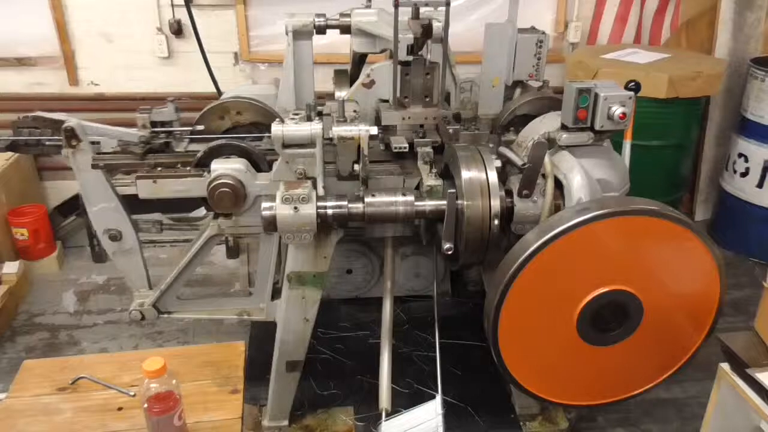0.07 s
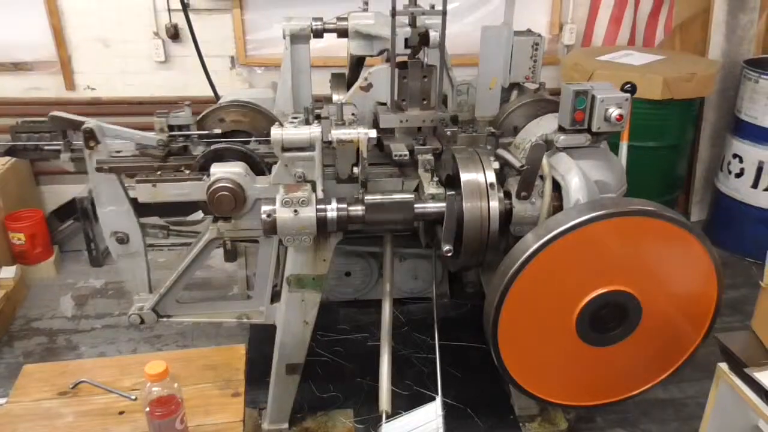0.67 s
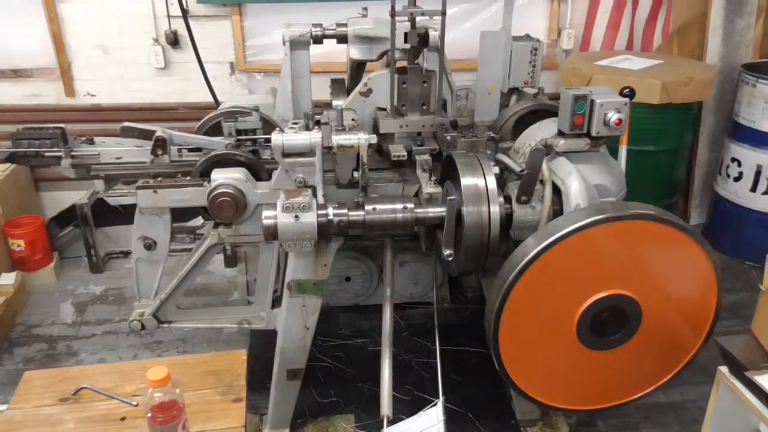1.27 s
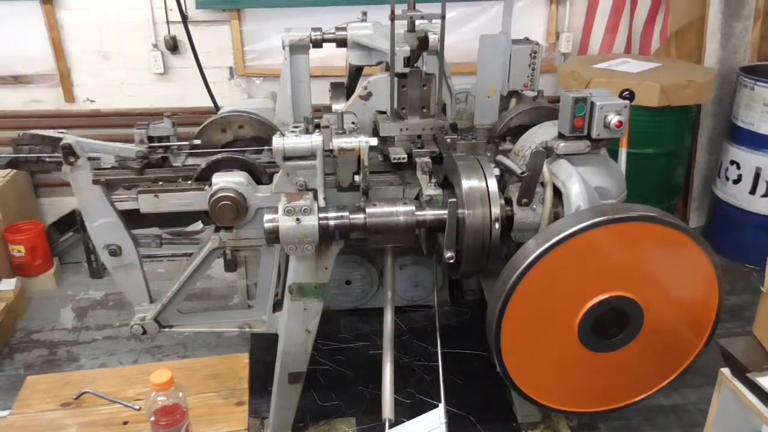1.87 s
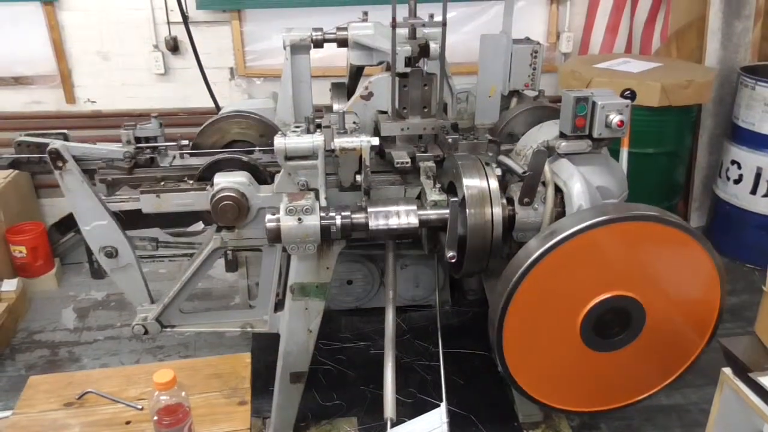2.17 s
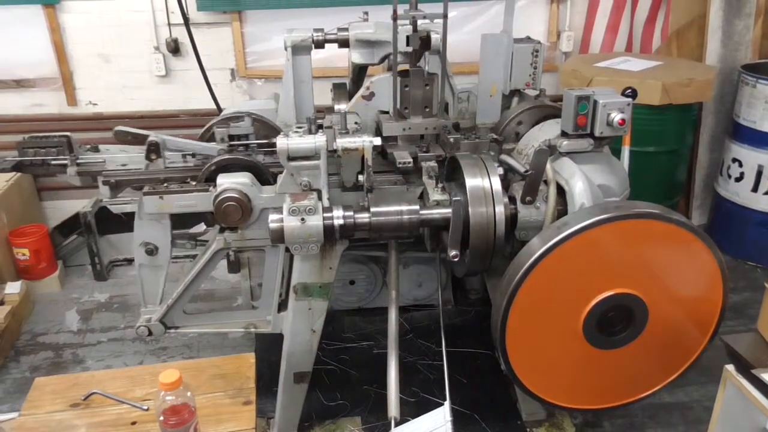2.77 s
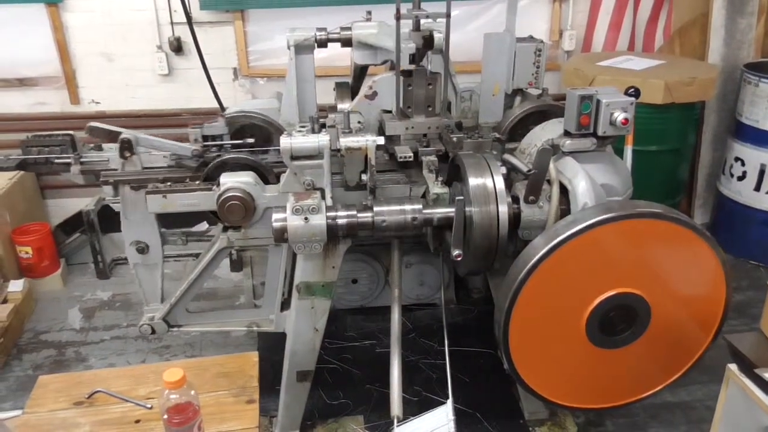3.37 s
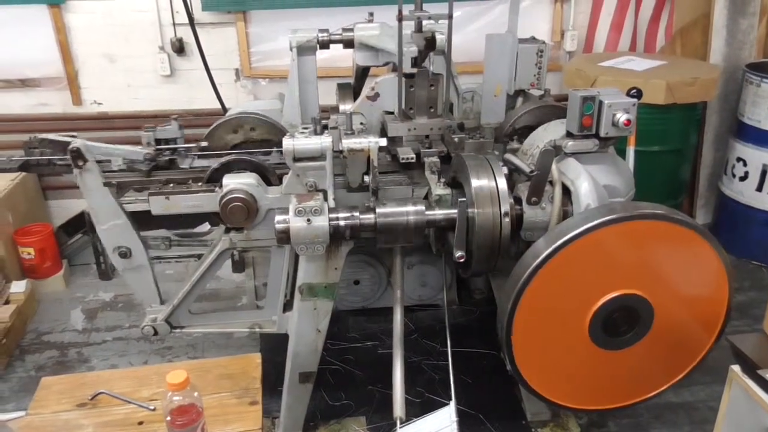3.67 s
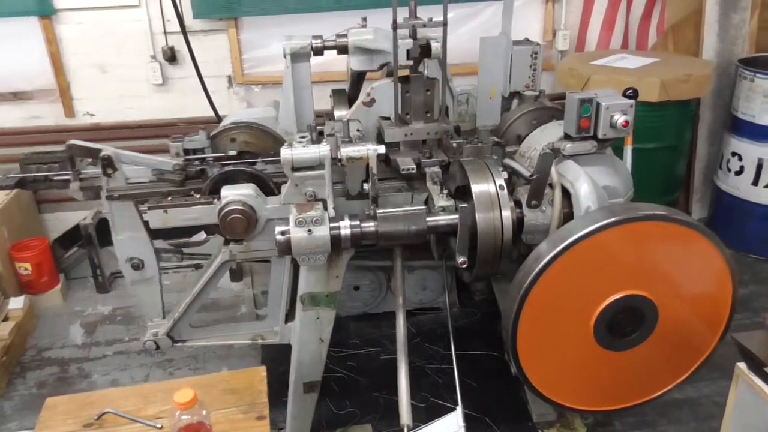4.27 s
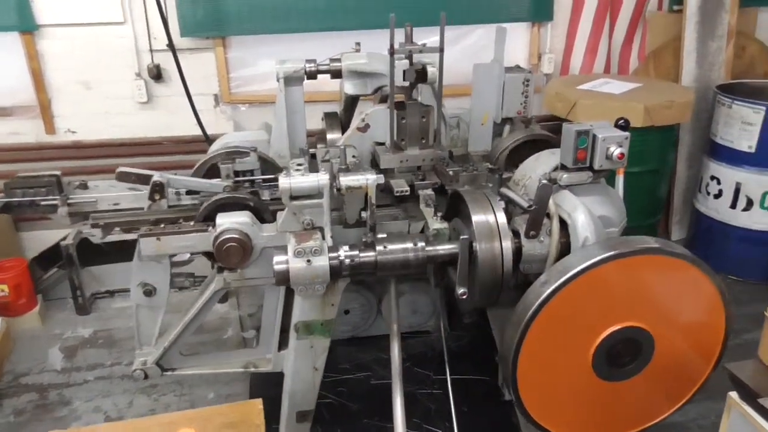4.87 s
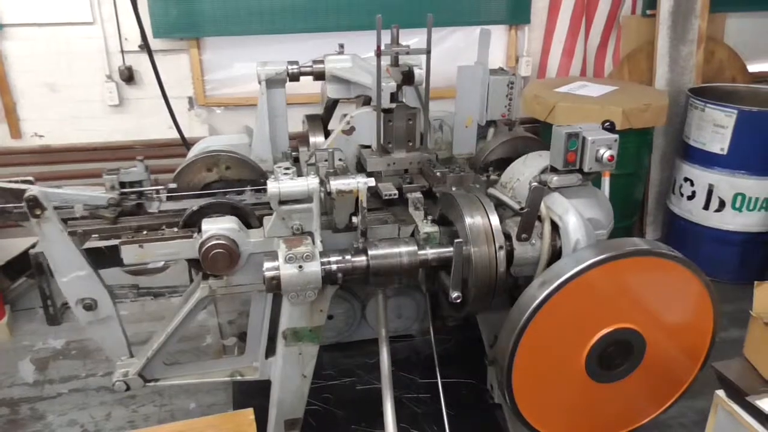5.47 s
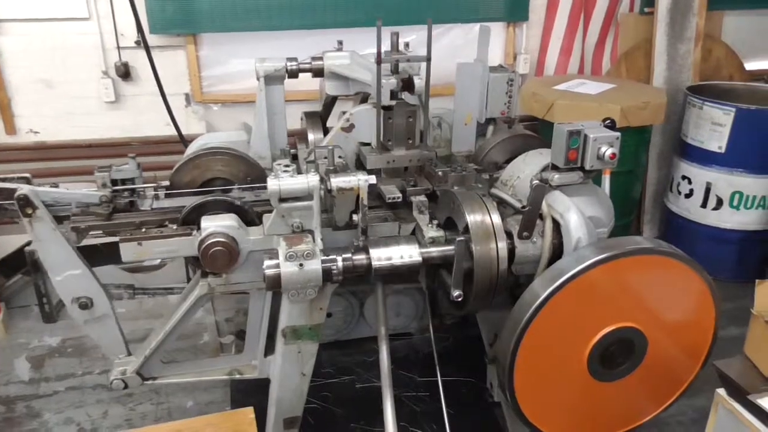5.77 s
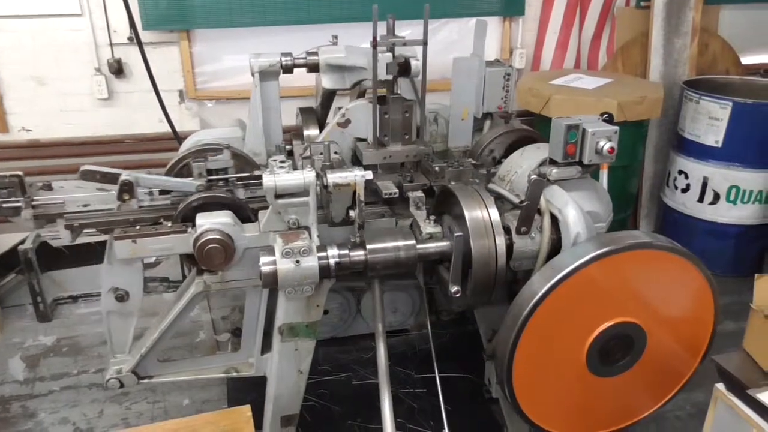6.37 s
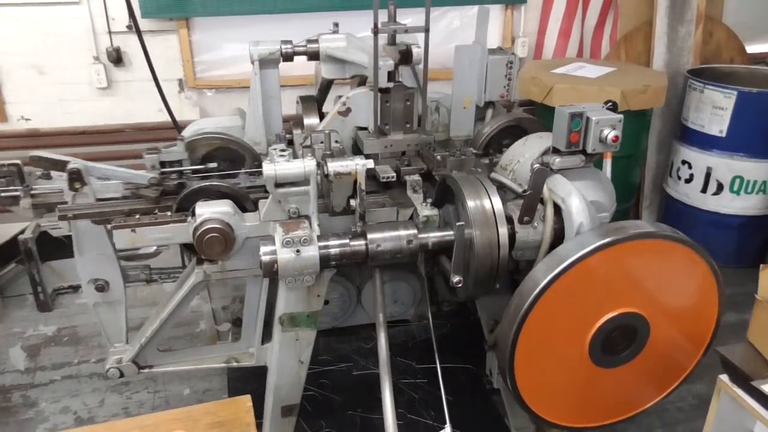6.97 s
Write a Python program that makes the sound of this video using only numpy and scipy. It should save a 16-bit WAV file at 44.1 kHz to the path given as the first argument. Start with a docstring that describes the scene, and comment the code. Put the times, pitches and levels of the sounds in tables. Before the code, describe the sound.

A metal stamping machine runs with a low gear whir, rhythmic steel clacks and thumps, and faint thin squeals.

```python
"""A workshop, about a metre from a belt-driven metal stamping machine; its camshaft turns every 1.78 s.
Motor and gears whir in the cast frame. On every turn the slides thump home, and clamp, punch, levers
and feed clack, steel on steel. Slides scrape in their guides and set thin steel ringing faintly,
while a dry bearing sticks and slips in thin squeals."""
import sys
import numpy as np
from scipy import signal
from scipy.fft import rfft, irfft
from scipy.io import wavfile

SR = 44100
rng = np.random.default_rng(int(sys.argv[2]) if len(sys.argv) > 2 else 0)


def file_out(sig):
    """Save sig as 16-bit WAV at sys.argv[1]."""
    # one column per channel
    cols = np.atleast_2d(sig).T
    # limit, then scale
    lim = np.clip(cols, -1, 1)
    pcm = np.round(lim * 32767).astype(np.int16)
    wavfile.write(sys.argv[1], SR, pcm)


N = 310464
T = np.arange(N) / SR
TURN_S = 1.7797
LEAN_LEFT = 10 ** (np.array([[.25], [-.25]]) / 20)   # the machine's body sits just left of centre
# the tool snaps free: t/s into the turn, level/dB
SNAP_HITS = [(1.3053, -11.5)]


def from_db(db):
    """Decibels to gain."""
    return 10 ** (np.asarray(db) / 20)


def unit_rms(x):
    """Scale to unit power."""
    return x / np.sqrt(np.mean(x ** 2) + 1e-20)


def envelopes(rows, period=None):
    """Each column of a breakpoint curve at every sample, looped if given a period."""
    times, *columns = np.transpose(rows)
    return [np.interp(T, times, column, period=period) for column in columns]


def every_turn(rows, accents_db=(0, 0, 0, 0)):
    """The cams repeat their hits, with one accent for each turn."""
    return [(s + turn * TURN_S, db + accent) for turn, accent in enumerate(accents_db)
            for s, db in rows if s + turn * TURN_S < T[-1]]


def at_hz(points, hz):
    """Read a curve on a log-frequency axis."""
    freqs, values = np.transpose(points)
    return np.interp(np.log(hz + 1e-9), np.log(freqs), values)


def drift(rate_hz):
    """Smooth random modulation, rms about 1."""
    hop, settle = 40, 2000
    pole = np.exp(-2 * np.pi * hop * rate_hz / SR)
    white = rng.standard_normal(N // hop + settle + 2)
    slow = signal.lfilter([1], [1, -2 * pole, pole * pole], white)[settle:]
    return np.interp(np.arange(N) / hop, np.arange(len(slow)), unit_rms(slow))


def noise(gain_at):
    """Coloured stereo noise, narrow in the bass and wide in the treble; rms 1."""
    # likeness of left and right: f/Hz, correlation
    likeness = [(30, 0.57), (70, 0.73), (130, 1), (250, 0.92), (500, 0.86), (1000, 0.64), (2000, 0.63),
                (4000, 0.4), (6500, 0.13), (8200, 0.057), (9700, -0.32), (12000, 0.085), (15000, -0.15)]
    hz = np.fft.rfftfreq(N, 1 / SR)
    alike = at_hz(likeness, hz)
    mid, side = rfft(rng.standard_normal((2, N)))
    stereo = np.sqrt(1 + alike) * mid + np.sqrt(1 - alike) * side * [[1], [-1]]
    return unit_rms(irfft(gain_at(hz) * stereo, N))


def dense_modes(colour, ripple_db=0):
    """A wash of overlapping modes; ripple makes some stand out at random."""
    mode_hz = np.linspace(0, SR / 2, 500)
    ripple = ripple_db * rng.standard_normal(len(mode_hz))
    return noise(lambda hz: from_db(at_hz(colour, hz) + np.interp(hz, mode_hz, ripple)))


def resonant(peaks):
    """A few noise-driven resonances; each level sets a share of the power."""
    return noise(lambda hz: np.sqrt(sum(
        from_db(db) ** 2 / width / (1 + 2 * ((hz - f) / width) ** 2) ** 2 for f, width, db in peaks)))


def struck(hits, modes, rise_s, scatter_db):
    """Blows on the machine's body: modes swell and die, slightly detuned on every hit."""
    out, t = np.zeros(N), T[:SR // 4]
    hz, mode_db, t60 = np.transpose(modes)[:, :, None]
    attack = 1 - np.exp(-(t / rise_s) ** 2)
    for s, db in hits:
        strength, detune = rng.standard_normal((2, len(modes), 1))
        decay = from_db(db + mode_db + scatter_db * strength - 60 * t / t60)
        rings = decay * np.sin(2 * np.pi * hz * (1 + .015 * detune) * t)
        at = round(s * SR)
        out[at:at + len(t)] += (rings.sum(0) * attack)[:N - at]
    return out * LEAN_LEFT


def clacks(hits, colour, level_db, t60, crack_db, rise_s, crack_s=0.0021, tail_db=-8.5, tail_t60=0.43):
    """Steel on steel: a brief crack, a ring of dense modes and a tail in the workshop."""
    power, t = np.zeros(N), T[:SR // 2]
    crack = from_db(crack_db) * np.exp(-t / crack_s)
    ring = from_db(-60 * t / t60)
    tail = from_db(tail_db - 60 * t / tail_t60)
    attack = 1 - np.exp(-t / rise_s)   # the ring spreads through the frame
    hit_power = (crack ** 2 + ring ** 2 + tail ** 2) * attack
    for s, db in hits:
        at = round(s * SR)
        power[at:at + len(t)] += (from_db(db + level_db) ** 2 * hit_power)[:N - at]
    low_cut = signal.butter(2, 170, "high", fs=SR, output="sos")   # small parts radiate little bass
    wide = signal.sosfilt(low_cut, np.sqrt(power) * dense_modes(colour, ripple_db=4.0))
    mid = wide.mean(axis=0)
    return mid + 0.52 * (wide - mid)   # near, direct sound reaches both ears more alike


def stick_slip(tones, waver_hz=36, flutter_db=4, attack_s=0.012, release_s=0.022, climb_hz_per_s=500):
    """Friction locks on to high modes; the tones creep upward, flutter at each ear and ring on."""
    out, waver, flutter, slips = np.zeros((2, N)), drift(43), drift(22), drift(300)
    for start, length, hz, db in tones:
        on = slice(round(start * SR), round((start + length + .2) * SR))
        t = T[on] - start
        swell = np.clip(t / attack_s, 0, 1) * np.exp(-np.maximum(t - length, 0) / release_s)
        own = (rng.integers(N, size=(2, 1)) + np.arange(len(t))) % N   # own modulation per tone and ear
        pitch = hz + climb_hz_per_s * (t - length / 2) + waver_hz * waver[own[0]]
        phase = 2 * np.pi * np.cumsum(pitch) / SR + 0.9 * slips[own]   # uneven slips fray the tone
        out[:, on] += from_db(db + flutter_db * flutter[own]) * swell * np.sin(phase)
    return out


def motor_hum(wander=0.00199, sway_db=2.5):
    """Motor, belt and gear tones all follow the motor's wandering speed."""
    # hum partials: f/Hz, level/dB
    partials = [(44.8, -51), (71.5, -53), (89.6, -47), (100.5, -43), (179.3, -41), (239.2, -34), (328, -37),
                (524.5, -43), (837, -33.5)]
    shaft_s = T + np.cumsum(wander * drift(1.55)) / SR
    return sum(from_db(db + sway_db * drift(3.5)) * np.sin(2 * np.pi * (hz * shaft_s + rng.random()))
               for hz, db in partials)


def mesh_song(throb_db=2.5, stray_hz=2.5):
    """Meshing teeth sing close, beating tones over a frayed resonance."""
    # mesh tones: f/Hz, relative level/dB
    partials = [(575.5, -1), (586.5, -7), (597.5, -2)]
    # resonances they sing in: f/Hz, width/Hz, level/dB
    peaks = [(582, 24, 0), (632, 36, -6)]
    tones = np.zeros(N)
    for hz, db in partials:
        throb = from_db(db + throb_db * drift(7))
        cycles = np.cumsum(hz + stray_hz * drift(2.99)) / SR + rng.random()
        tones += throb * np.sin(2 * np.pi * cycles)
    return from_db(-0.5) * unit_rms(tones) + from_db(-4.5) * resonant(peaks)


def drive_train():
    """The bed: gears rumble in the frame and whir in their housing, roughened by tooth contacts."""
    # load on the drive: t/s into the turn, rumble/dB, whir/dB, song/dB
    load = [(0.07, -24.5, -27, -30), (0.3, -22, -27.5, -30), (0.45, -20.5, -25.5, -28.5),
            (0.59, -25, -26, -29), (0.72, -22.5, -25, -29.5), (1.0, -24.5, -26.5, -26),
            (1.11, -23, -26, -24.5), (1.29, -21.5, -24.5, -27), (1.48, -26, -27.5, -31),
            (1.56, -24, -27.5, -27), (1.71, -23.5, -25, -30)]
    # slow swell of the mesh song: t/s, level/dB
    song_swell = [(0.1, -1), (1.1, -2.5), (1.9, 0), (2.3, -2), (2.8, -1), (3.3, -3), (3.9, -2), (4.3, 1),
                  (4.7, -1), (5.3, 2), (5.6, 5), (6.3, 2), (6.65, -3), (6.87, 7.5), (7.04, 8)]
    # frame rumble: f/Hz, level/dB
    rumble_colour = [(25, -58), (60, -23), (85, -19), (105, -16.5), (132, 4), (165, -8.5), (200, 1),
                     (260, -6), (325, -2), (410, -12.5), (520, -9.5), (800, -41)]
    # gear whir: f/Hz, level/dB
    whir_colour = [(60, -46), (300, -4), (430, -2), (520, -1), (650, -1), (820, -8.5), (1000, -5.5),
                   (1300, -14), (1600, -14.5), (2000, -33), (3500, -26), (9000, -90)]
    # gear housing: f/Hz, width/Hz, level/dB
    housing_peaks = [(850, 77, -8.5), (720, 70, -7.5), (1278, 210, -10)]
    rumble_db, whir_db, song_db = envelopes(load, TURN_S)
    swell_db, = envelopes(song_swell)
    teeth = drift(21)
    rumble = from_db(rumble_db + 0.5 * teeth) * dense_modes(rumble_colour)
    whir = from_db(whir_db + 0.5 + 1.5 * teeth) * dense_modes(whir_colour)
    housing = from_db(whir_db - 4) * resonant(housing_peaks)
    song = from_db(song_db + swell_db) * mesh_song()
    return (rumble + whir + housing + song + motor_hum()) * LEAN_LEFT


def sliding_steel():
    """Slides scrape and hiss in their guides and set thin steel ringing."""
    # friction: t/s into the turn, scrape/dB, hiss and ring/dB
    friction = [(0.02, -34.5, -35.5), (0.13, -36, -33), (0.25, -39.5, -37), (0.33, -34, -34.5),
                (0.43, -37, -37), (0.63, -36, -34.5), (0.78, -35.5, -37), (0.92, -35.5, -34.5),
                (1.15, -34, -36), (1.27, -34.5, -33), (1.37, -33, -36.5), (1.49, -37.5, -37),
                (1.67, -34.5, -31.5)]
    # slow swell of hiss and ring: t/s, level/dB
    ring_swell = [(0.2, -1), (0.5, 2), (0.7, 0), (0.9, 1.2), (1.7, -0.5), (2.2, -.5), (2.7, 4), (3.1, 0.5),
                  (3.5, -0.5), (3.75, 1), (4.1, -2.5), (4.47, 3), (4.75, 1.5), (5.3, -1), (5.6, -1),
                  (6.0, 4.2), (6.25, 2), (6.55, 0), (7.0, 1)]
    # scrape: f/Hz, level/dB
    scrape_colour = [(1000, -11), (1600, -8), (2000, 6.5), (2600, 0.5), (3400, 1), (4500, 1.5),
                     (5700, -4.5), (7500, -2.5), (12000, -25), (15000, -36)]
    # hiss: f/Hz, level/dB
    hiss_colour = [(4500, -7), (6200, -8), (8500, 3), (10500, 3.5), (12300, -0.5), (13500, -4),
                   (14700, -17), (15400, -26), (15900, -35)]
    # thin steel: f/Hz, width/Hz, level/dB
    steel_peaks = [(6950, 120, 5), (7031, 35, 1), (7752, 35, 6), (8237, 14, 5), (8300, 60, 10),
                   (8375, 80, 11), (8505, 50, 9), (8595, 50, 6), (8690, 90, 9), (8872, 45, 9),
                   (9049, 35, 6), (9258, 40, 8), (9521, 30, 2), (9785, 28, 5), (10140, 120, 5),
                   (10460, 30, 5.5)]
    scrape_db, high_db = envelopes(friction, TURN_S)
    swell_db, = envelopes(ring_swell)
    scrape = from_db(scrape_db) * dense_modes(scrape_colour, ripple_db=3.0)
    hiss = from_db(high_db + swell_db - 2) * dense_modes(hiss_colour, ripple_db=1.0)
    grain = from_db(0.9 * drift(37))
    ring = from_db(high_db + 1.24 * swell_db - 1.5) * resonant(steel_peaks)
    return grain * (scrape + hiss) + ring


def clamp():
    """The clamp clacks shut on the stock."""
    # contact: t/s into the turn, level/dB
    hits = [(0.173, -10)]
    # accent per turn: level/dB
    accents = [-0.79, 0.5, 0.5, 0.36]
    # clack: f/Hz, level/dB
    colour = [(600, 15), (950, 2.5), (1300, 19), (1650, 8.5), (2200, -3), (3250, 3.5), (4100, -11),
              (4650, -2), (5400, -5.5), (7000, -0.5), (8200, 4), (11000, -16), (15000, -30)]
    return clacks(every_turn(hits, accents), colour, level_db=-6.5, t60=0.12, crack_db=6.5, rise_s=.003)


def frame_thumps():
    """Slides thump home in the cast frame; belt and gears bump it now and then."""
    # two slides and a rebound: t/s into the turn, level/dB
    hits = [(0.186, -5), (0.372, -7.8), (0.465, -14)]
    # accent per turn: level/dB
    accents = [-0.3, 0.3, 0.5, -0.5]
    # stray bumps: t/s, level/dB
    bumps = [(1.06, -15), (2.602, -15), (2.878, -15.5), (3.03, -13), (3.145, -16.5), (4.275, -13),
             (4.975, -15.5)]
    # cast frame: f/Hz, level/dB, t60/s
    modes = [(134.6, 1, 0.14), (197.2, 7, 0.11), (215, -20, 0.084), (291, 16.5, 0.047), (360, -23, 0.021),
             (594, -34, 0.054)]
    return struck(every_turn(hits, accents) + bumps, modes, rise_s=0.019, scatter_db=1.2)


def punch():
    """The punch crunches through the stock and rings the die block under it."""
    # crunch: t/s into the turn, level/dB
    hits = [(0.303, -28), (0.341, -18), (0.358, -15.5), (0.371, -17.5)]
    # die block's accent per turn: level/dB
    accents = [2, 0.5, -8, 2.5]
    # crunch: f/Hz, level/dB
    colour = [(300, 1), (620, 14.5), (950, 10.5), (1250, 12.5), (1750, -0.5), (2200, -6), (2900, -2.5),
              (3600, 0.5), (4800, -1.5), (6300, -6), (8000, -10), (11000, -12), (15000, -30)]
    # die block: f/Hz, level/dB, t60/s
    modes = [(480, -5, 0.068), (618, 3, 0.11), (894, -4, 0.058), (1230, -6, 0.023), (1485, -8, .03),
             (2270, -11, 0.086)]
    block = from_db(-6.5) * struck(every_turn(hits, accents), modes, rise_s=0.0018, scatter_db=0)
    return block + clacks(every_turn(hits), colour, level_db=-6, t60=0.17, crack_db=11,
                          rise_s=0.00075, crack_s=0.0029)


def die_squeak(hz=4620, length_s=0.022):
    """On some strokes the punch squeaks in the die."""
    # squeaks: t/s, level/dB
    squeaks = [(0.338, -36), (3.908, -38), (5.681, -33)]
    return stick_slip([(s, length_s, hz, db) for s, db in squeaks])


def loose_links():
    """Links clunk as the load changes sides, and slack joints knock in between."""
    # clunks: t/s into the turn, level/dB
    hits = [(0.4293, -17.5), (0.8825, -22.5), (1.3678, -13.5), (1.385, -22.5), (1.7098, -22)]
    # stray joint knocks: t/s, level/dB
    joints = [(1.1151, -15), (1.6744, -17), (2.2087, -16), (3.384, -20), (3.8649, -19), (3.9846, -21),
              (4.0555, -19), (4.239, -18), (4.4436, -18), (4.6686, -20), (4.9255, -21), (5.6433, -20),
              (5.9337, -18), (6.2205, -18)]
    # steel link: f/Hz, level/dB, t60/s
    modes = [(1077, 3.5, 0.039), (1313, -1.5, 0.096), (1565, -6.5, 0.094), (1876, -5.5, 0.048)]
    return from_db(-7.5) * struck(every_turn(hits) + joints, modes, rise_s=0.0013, scatter_db=1.5)


def dry_bearing(chirp_hz=6390):
    """The bearing squeals on its high modes and chirps on a lower one and its octave."""
    # squeals: t/s, length/s, f/Hz, level/dB
    squeals = [(0.452, .1, 14260, -43), (0.47, .08, 13780, -49), (0.628, .145, 14330, -35),
               (0.652, .125, 13720, -37), (0.793, .12, 14620, -44), (1.025, .08, 14280, -41),
               (2.215, .17, 14280, -43), (2.26, .12, 13800, -46), (3.79, .1, 14220, -41),
               (3.925, .23, 14340, -38), (3.945, .2, 13740, -37.5), (4.42, .09, 14400, -46),
               (4.915, .025, 14520, -42), (5.448, .045, 14350, -43), (5.485, .075, 14080, -38),
               (5.575, .105, 13800, -39), (5.595, .08, 14280, -38), (6.48, .11, 13300, -47)]
    # chirps: t/s, length/s, tone/dB, octave/dB
    chirps = [(0.528, 0.075, -45, -36), (0.623, .05, -39, -52), (0.772, .025, -56, -35),
              (2.363, 0.093, -56, -35), (3.843, 0.063, -39, -39), (5.492, .065, -54, -34),
              (5.669, 0.028, -50, -29)]
    partials = [(s, length, harmonic * chirp_hz, db)
                for s, length, *levels in chirps for harmonic, db in enumerate(levels, 1)]
    return stick_slip(squeals + partials)


def cam_follower():
    """A cam follower knocks and rings its arm."""
    # knock: t/s into the turn, level/dB
    hits = [(0.604, -9)]
    # accent per turn: level/dB
    accents = [2.5, -0.5, 0.5, 2.5]
    # follower arm: f/Hz, level/dB, t60/s
    modes = [(590, -3, .05), (775, 3, 0.06), (820, 2, 0.05), (985, -3, .05), (1340, -7, .05)]
    return struck(every_turn(hits, accents), modes, rise_s=0.007, scatter_db=0.6)


def levers():
    """Levers clack softly as their play is taken up."""
    # contacts: t/s into the turn, level/dB
    hits = [(0.675, -12), (0.699, -20.5), (0.883, -17), (1.234, -15)]
    # clack: f/Hz, level/dB
    colour = [(500, 5.5), (800, 19.5), (1350, 6), (1700, 2.5), (2200, 4.5), (2900, -1.5), (3800, 1),
              (4800, -3), (5700, -0.5), (6500, -9), (8500, 1), (15000, -18)]
    return clacks(every_turn(hits), colour, level_db=-7, t60=0.18, crack_db=-6, rise_s=.002)


def stock_rubs(swell_s=0.02):
    """Each rub of the stock swells and fades in its guide's resonances."""
    # rubs: t/s, level/dB
    rubs = [(0.81, -35), (2.675, -35), (4.81, -38), (6.235, -40), (6.35, -38)]
    # guide: f/Hz, width/Hz, level/dB
    peaks = [(2140, 150, 1), (2250, 340, -2)]
    return sum(from_db(db) * np.exp(-((T - s) / swell_s) ** 2) for s, db in rubs) * resonant(peaks)


def forming_slide(start_hz=664.0, end_hz=208.4, length_s=.08, roughness=0.184):
    """The slide grinds home on a rough, falling note."""
    # grind: t/s into the turn, level/dB
    grinds = [(1.228, -20)]
    out, jitter = np.zeros(N), drift(214)
    for s, db in every_turn(grinds):
        on = slice(round(s * SR), round((s + length_s) * SR))
        travel = np.linspace(0, 1, len(T[on]))
        hz = start_hz * (end_hz / start_hz) ** travel * (1 + roughness * jitter[on])
        swell = np.sqrt(np.abs(np.sin(np.pi * travel)))
        out[on] += from_db(db) * swell * np.sin(2 * np.pi * np.cumsum(hz) / SR)
    return out * LEAN_LEFT


def tool_snap():
    """The hardened tool snaps free with a bright crack and a short ring."""
    # accent per turn: level/dB
    accents = [0, 0.8, -0.3, -1]
    # crack: f/Hz, level/dB
    colour = [(600, 11), (1150, 11.5), (1700, -1.5), (2000, 5.5), (2500, -11), (3600, 4.5), (4700, 1.5),
              (5800, -2), (8000, 5.5), (10500, 6.5), (12000, 9), (13200, 1), (15500, -8)]
    # hardened tool: f/Hz, level/dB, t60/s
    modes = [(870, 4, .03), (1180, 4, 0.03), (1550, 0, .025), (1970, 1, 0.024), (2830, -3, 0.018),
             (3500, -1, 0.014), (4800, -1, 0.012), (8540, -3, 0.02), (10300, -6, .025), (12400, -4, 0.03)]
    hits = every_turn(SNAP_HITS, accents)
    ring = from_db(-7) * struck(hits, modes, rise_s=0.0004, scatter_db=1.5)
    return ring + clacks(hits, colour, level_db=-6.5, t60=0.12, crack_db=7, rise_s=0.0004, tail_db=-11)


def slack_gain(duck_db=-4.5, slack_s=0.069):
    """After each snap the drive runs slack, and quieter, until it takes up load again."""
    snap_s = np.array(every_turn(SNAP_HITS))[:, :1]
    since = np.clip(T - snap_s, -1, 1)
    slack = (since > 0) * np.exp(-(since / slack_s) ** 4)
    return from_db(duck_db * slack.sum(axis=0))


def feed_pawl():
    """The feed pawl drops with a clack and rebounds."""
    # drop and rebound: t/s into the turn, level/dB
    hits = [(1.404, -10), (1.434, -32)]
    # accent per turn: level/dB
    accents = [-2.5, -2, 0, -2]
    # clack: f/Hz, level/dB
    colour = [(800, 9.5), (1400, 11.5), (2000, -5), (2800, -18), (3550, 4), (4500, -1), (5400, -15),
              (7500, 0.5), (8700, 8), (9400, 4), (12000, -3), (13900, 1), (15500, -21)]
    return clacks(every_turn(hits, accents), colour, level_db=-7.5, t60=0.14, crack_db=6.5, rise_s=.001)


def feed_arm():
    """The feed arm hits its stop with a full-bodied clack and bounces."""
    # hit and bounce: t/s into the turn, level/dB
    hits = [(1.709, -11), (1.7497, -20.5)]
    # accent per turn: level/dB
    accents = [0.8, -0.34, 0.46]
    # clack: f/Hz, level/dB
    colour = [(200, 22), (360, 21), (560, 20), (1250, 16.5), (1650, 1), (2000, 5.5), (2700, 10.5),
              (3000, 3.5), (3700, 11.5), (5300, 1.5), (7300, 8.5), (9000, 4.5), (11000, 3), (13600, 2),
              (15000, -22)]
    return clacks(every_turn(hits, accents), colour, level_db=-4.5, t60=0.13, crack_db=5,
                  rise_s=.0012, tail_db=-10)


def backlash():
    """Backlash in the drive jolts the heavy gears, which their grease damps."""
    # jolts: t/s, level/dB
    hits = [(3.0118, -15), (3.4887, -15.5), (4.796, -23), (6.5787, -22)]
    # gears: f/Hz, level/dB, t60/s
    modes = [(404, -1, .06), (545, -4, .045), (705, -2, .05), (900, -4, .035), (1130, -5, .025),
             (1330, -7, .03), (2400, -13, .03)]
    return struck(hits, modes, rise_s=0.0006, scatter_db=1.2)


def spring_ticks():
    """A small spring ticks against its seat."""
    # ticks: t/s, level/dB
    hits = [(4.7349, -23), (4.7385, -26)]
    # spring: f/Hz, level/dB, t60/s
    modes = [(2300, -4, .02), (3500, -4, .02), (6280, -3, .025), (6500, -1, .03), (6800, -3, .02),
             (12900, -12, .015)]
    return struck(hits, modes, rise_s=0.001, scatter_db=4.5)


def scene():
    """The whole machine: drive bed, tool hits, knocks and friction."""
    bed = slack_gain() * drive_train()
    tools = clamp() + punch() + levers() + tool_snap() + feed_pawl() + feed_arm()
    knocks = frame_thumps() + loose_links() + cam_follower() + backlash() + spring_ticks()
    friction = sliding_steel() + die_squeak() + dry_bearing() + stock_rubs() + forming_slide()
    return bed + tools + knocks + friction


def record(dry):
    """The sound opens after a moment of silence; the highest peaks are rounded and the top is cut."""
    start_s, fade_s, ceiling, cutoff_hz = .094, .004, .75, 15600
    fade_in = np.clip((T - start_s) / fade_s, 0, 1)
    rounded = dry / (1 + (dry / ceiling) ** 6) ** (1 / 6)
    high_cut = signal.ellip(10, .1, 90, cutoff_hz, fs=SR, output="sos")
    return signal.sosfilt(high_cut, rounded * fade_in)


dry = scene()
out = record(dry)
file_out(out)
```